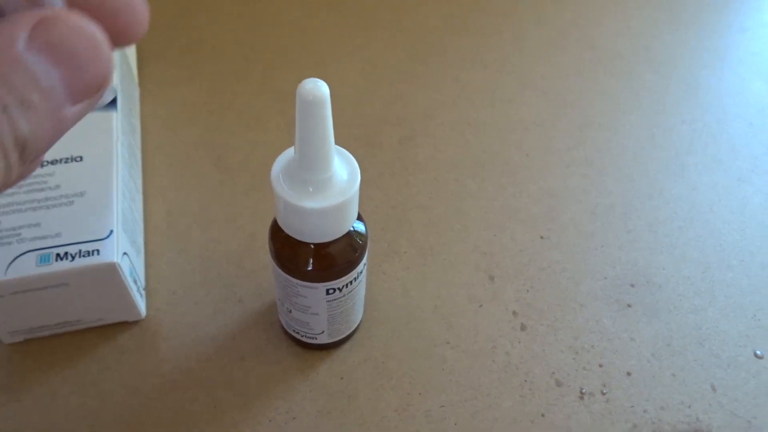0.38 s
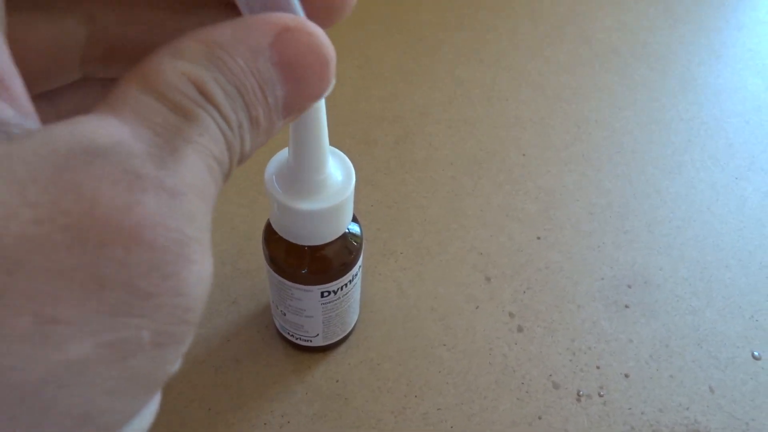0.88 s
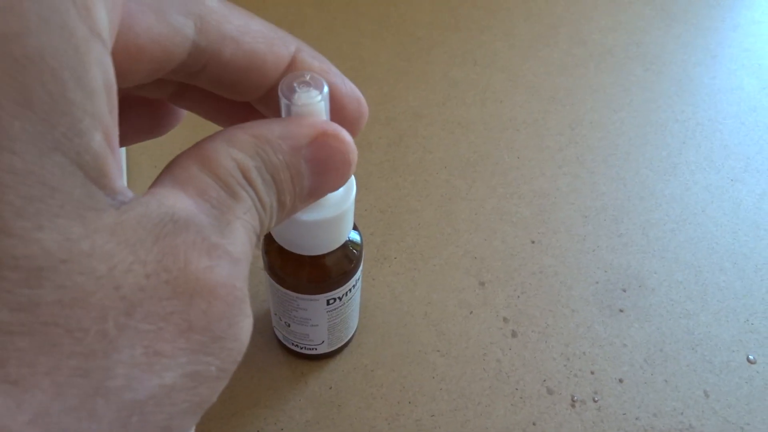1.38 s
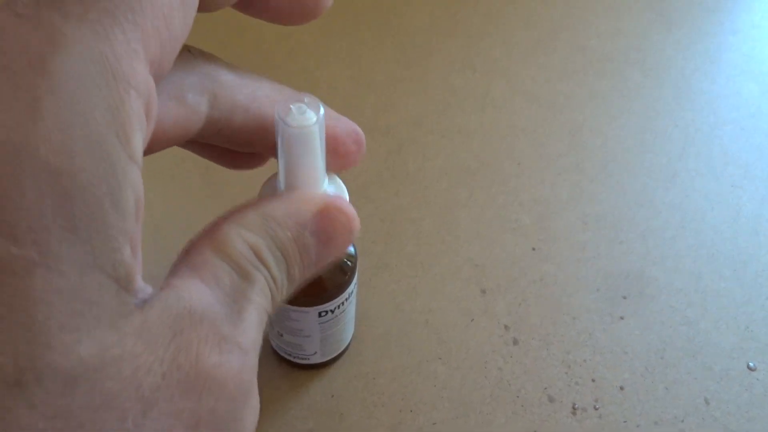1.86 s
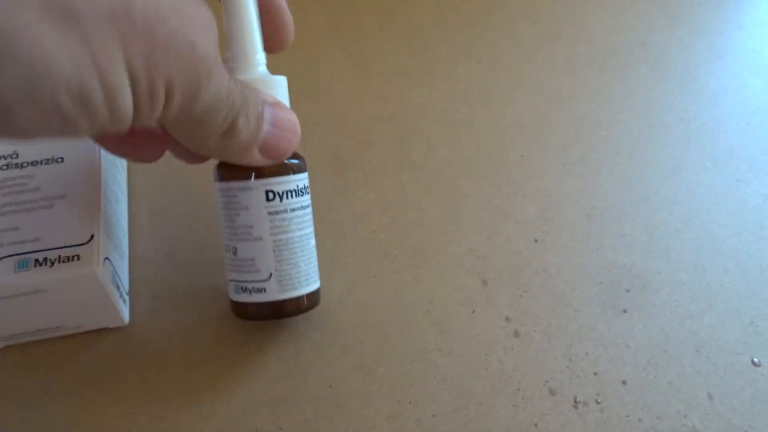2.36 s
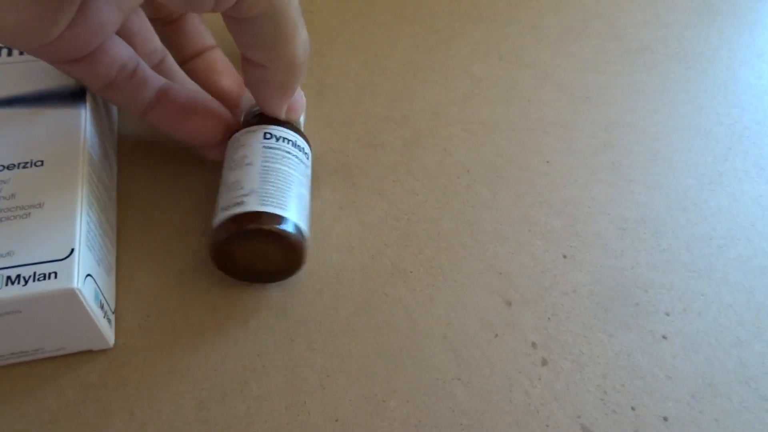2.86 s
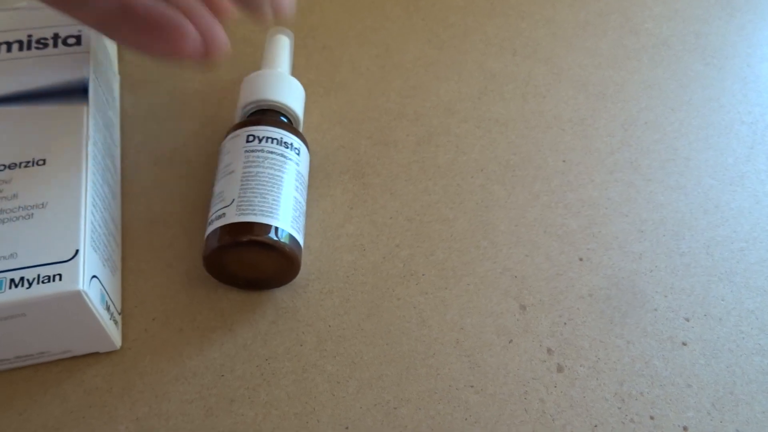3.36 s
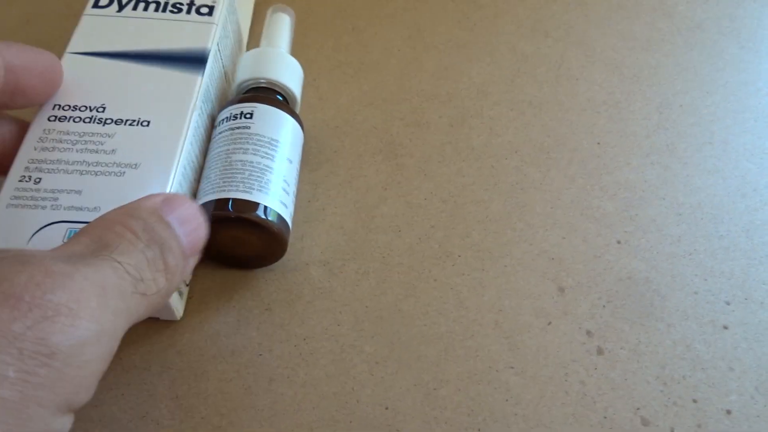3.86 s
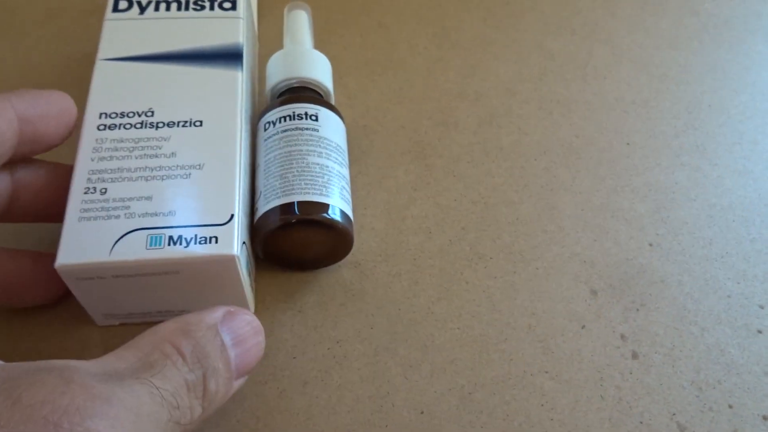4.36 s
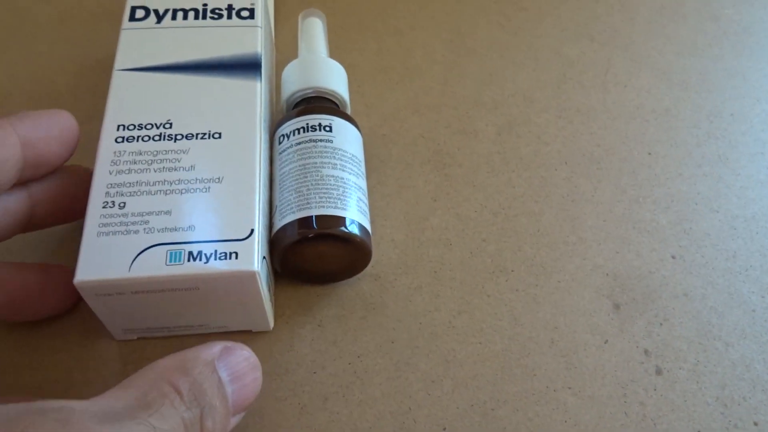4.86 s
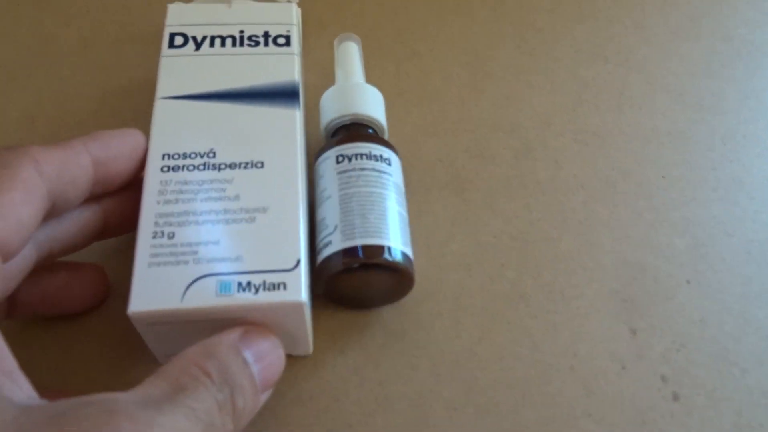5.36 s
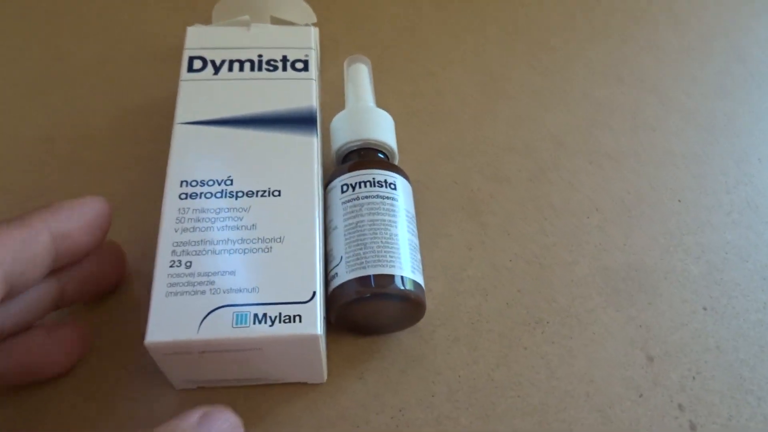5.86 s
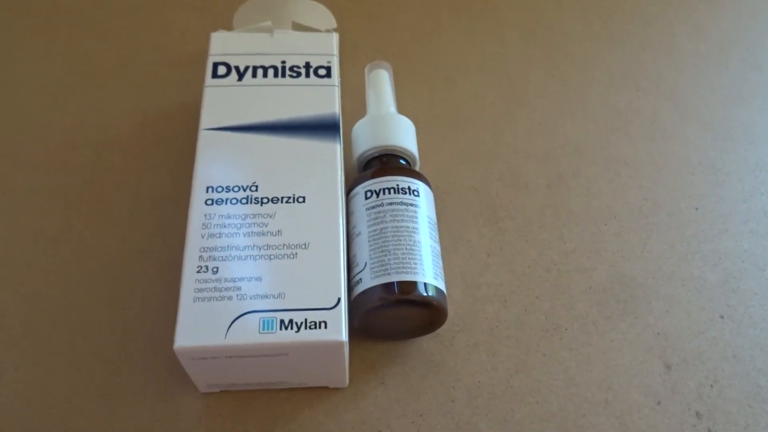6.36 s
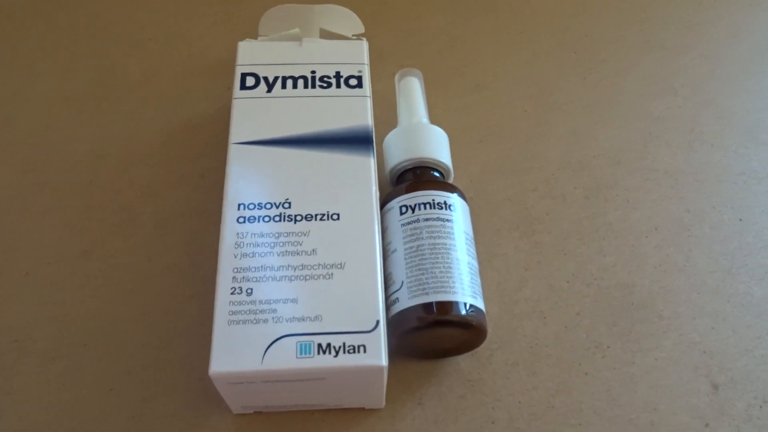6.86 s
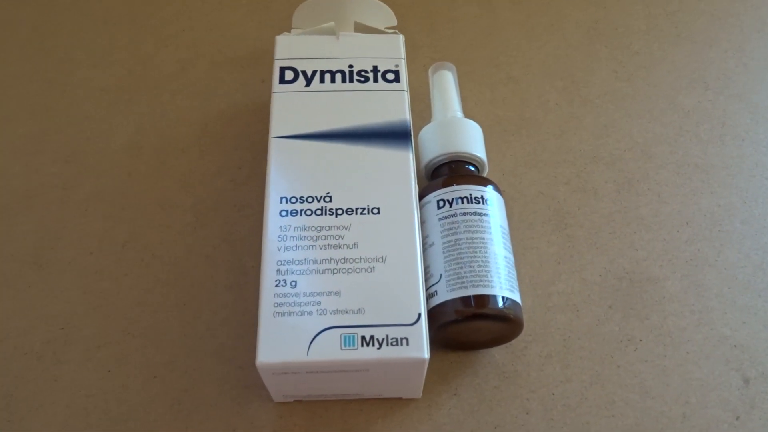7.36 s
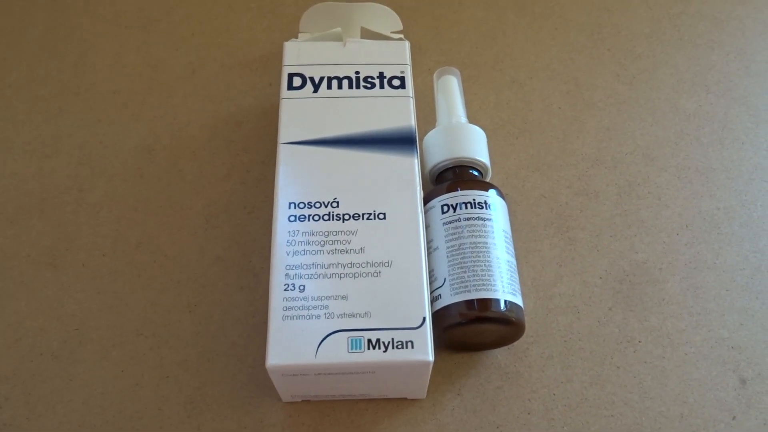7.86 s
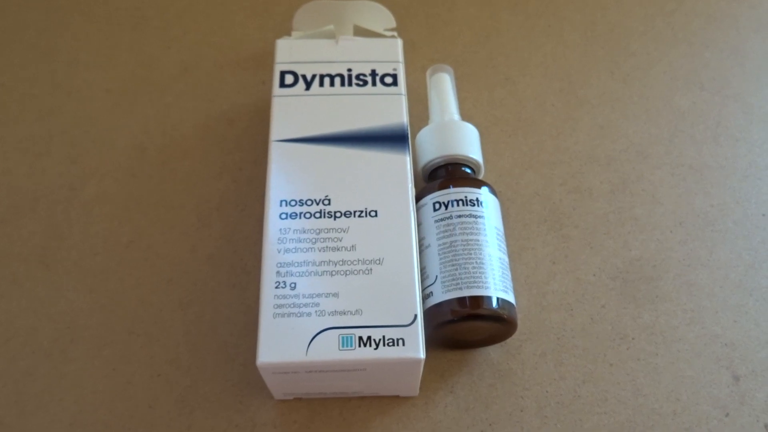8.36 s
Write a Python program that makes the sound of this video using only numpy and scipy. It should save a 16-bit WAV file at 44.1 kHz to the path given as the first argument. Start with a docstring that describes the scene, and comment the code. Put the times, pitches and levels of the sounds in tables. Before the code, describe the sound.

A plastic cap clicks onto a small glass bottle, which knocks on a wooden table; a cardboard box taps beside it while small metal pieces jingle.

```python
"""A wooden table in a quiet room, a phone's microphone close by. A plastic cap is pushed onto a small glass
bottle, the bottle is turned and laid down, and a cardboard box is slid beside it: blows ring the modes of
object and table, drags shake them with stick-slip grains. To the right small metal pieces jingle as decaying,
fluttering notes; cloth and skin rustle as coloured noise. Room hum and microphone hiss lie under it all."""
import sys
import numpy as np
from scipy import signal
from scipy.fft import rfft, irfft, next_fast_len
from scipy.io import wavfile
from scipy.ndimage import uniform_filter1d

SR = 44100
rng = np.random.default_rng(int(sys.argv[2]) if len(sys.argv) > 2 else 0)


def wav_record(signal):
    """Record a signal, one row per channel, as 16-bit PCM in the file named by sys.argv[1]."""
    frames = np.transpose(np.atleast_2d(signal))
    bounded = np.clip(frames, -1, 1)
    # unit amplitude maps onto the largest positive 16-bit level
    quanta = np.round(bounded * 32767).astype(np.int16)
    wavfile.write(sys.argv[1], SR, quanta)


def field_ratio(decibels):
    """Amplitude ratio for a level in dB (20 dB per decade); scalars and array-likes work."""
    return 10 ** (np.asarray(decibels, dtype=float) / 20)


N = 373968


def noise(spectrum):
    """Steady noise of rms 1, its colour drawn through (Hz, dB) points."""
    hz, db = np.transpose(spectrum)
    size = next_fast_len(N)
    f = np.maximum(np.arange(size // 2 + 1) * SR / size, 1)
    gain = field_ratio(np.interp(np.log(f), np.log(hz), db))
    x = irfft(rfft(rng.standard_normal(size)) * gain, size)[:N]
    return x / x.std()


def walk(rate_hz):
    """Random levels drawn at rate_hz and joined by slopes; spread near 1."""
    hold = int(SR / rate_hz)
    levels = np.repeat(rng.standard_normal(N // hold + 1), hold)
    return uniform_filter1d(levels, hold)[:N]


def ring(modes, spread_db=0., detune=0., length_s=.6):
    """Decaying sines of a tapped body, peak 1; each tap may weight and tune its modes differently."""
    hz, db, t60_s = np.transpose(modes)[:, :, None]
    t = np.arange(int(length_s * SR)) / SR
    gain = field_ratio(db + spread_db * rng.standard_normal(hz.shape))
    hz = hz * (1 + detune * rng.standard_normal(hz.shape))
    x = (gain * np.sin(2 * np.pi * hz * t) * field_ratio(-60 * t / t60_s)).sum(axis=0)
    return x / np.abs(x).max()


def add(out, start_s, x):
    """Mix x into out from start_s."""
    i = int(start_s * SR)
    out[i:i + len(x)] += x[:len(out) - i]


def band(x, lo_hz, hi_hz):
    """Band-pass."""
    edges_hz = [lo_hz, min(hi_hz, .45 * SR)]
    return signal.sosfilt(signal.butter(2, edges_hz, "band", fs=SR, output="sos"), x)


def pressure(strokes, peaks_db):
    """Level of a row of strokes: each swells to its peak and dies away, and their powers add."""
    time = np.arange(N) / SR
    power = np.zeros(N)
    for (peak_s, rise_s, fall_s, *_), db in zip(strokes, peaks_db):
        away = np.where(time < peak_s, (peak_s - time) / rise_s, (time - peak_s) / fall_s)
        power += field_ratio(db - 6.74 * np.minimum(away, 4) ** 1.87) ** 2
    return np.sqrt(power)


# colour of the room hum and hiss: pitch_hz, level_db (relative, per Hz)
AIR_COLOUR = [(18, -38), (30, -12), (149, -2.5), (183, -4.5), (716, -11), (1610, -14.5), (4370, -22),
              (10700, -23), (15800, -27)]
# tilt of the stereo side against that colour: pitch_hz, tilt_db
AIR_SIDE_TILT = [(60, -35), (200, -11.5), (700, -5.5), (1300, -6), (4400, -12.5), (15000, -18.5)]


def air():
    """Room hum and microphone hiss as noise: the middle range is wide, bass and treble are centred."""
    hz, db = np.transpose(AIR_COLOUR)
    tilt_hz, tilt_db = np.transpose(AIR_SIDE_TILT)
    side_colour = np.transpose([hz, db + np.interp(np.log(hz), np.log(tilt_hz), tilt_db)])
    side = field_ratio(-7.5) * noise(side_colour) * np.array([[1], [-1]])
    swell = field_ratio(-60.5 + .6 * walk(1.5))
    return swell * (noise(AIR_COLOUR) + side)


# notes of the metal pieces, one list each for the high, low and middle notes: pitch_hz; close pairs beat
METAL_HZ = [
    [10905, 10980, 11055, 8530, 11872, 11895, 14440],
    [5158, 6006, 5590, 1410],
    [10400, 10420],
]
# the same lists: level_db (relative)
METAL_DB = [
    [-2, 1, -13, -13, -8, -13, -9],
    [6, -8, -15, -22],
    [0, -9],
]
# high, low, middle: t60_s before the damping
METAL_T60_S = [0.44, 0.86, 0.23]
# high, low, middle: swell_s of the chatter
CHATTER_S = [0.011, 0.03, 0.011]
# high, low, middle: damping_s
METAL_DAMP_S = [.15, .165, .14]
# high, low, middle: jump_db, spread of the level jumps before they are slewed
FLUTTER_DB = [4.5, 2.2, 4]
# high, low, middle: rebound_db, level against the first touch
REBOUND_DB = [-11, -3, -2]
# touches: start_s, strength_db, rebound_after_s, low_db (low notes against the high ones)
JINGLES = [(0.001, -27, .04, -12), (0.251, -29, .04, -12), (2.611, -38, .028, -10),
           (2.827, -32.5, 0.09, -11.5), (3.2191, -52, .03, -14), (4.205, -65, .03, -3),
           (4.85, -58, .03, -13), (5.7846, -56.5, .03, -11), (6.088, -33.5, 0.069, -13),
           (6.232, -28, .027, -13), (6.334, -27, .042, -6), (6.4388, -25, .059, -13),
           (6.915, -34, .042, -11.5), (7.042, -31.5, .03, -12), (7.6054, -38, .028, -10.5),
           (8.253, -28, .025, -20)]


def brushed(modes, jump_db):
    """Notes of pieces that keep brushing each other: each jumps in level at uneven moments."""
    x = 0
    for mode in modes:
        note = field_ratio(mode[1] + 2 * rng.standard_normal()) * ring([mode], detune=0.00052)
        edges = np.cumsum(rng.exponential(.022 * SR, size=40))  # mean time between jumps .022 s
        levels = rng.standard_normal(41)
        steps = levels[np.searchsorted(edges, np.arange(len(note)))]
        x = x + note * field_ratio(jump_db * uniform_filter1d(steps, size=40))
    return x / np.sum(field_ratio(np.array(modes)[:, 1]))


def metal_jingle():
    """Metal pieces swing together and rebound; chatter swells the notes, mutual contact cuts them short."""
    out = np.zeros(N)
    t = np.arange(int(.6 * SR)) / SR
    groups = [[(f, g, t60_s) for f, g in zip(hz, db)]
              for hz, db, t60_s in zip(METAL_HZ, METAL_DB, METAL_T60_S)]
    swell = 1 - np.exp(-t / np.array(CHATTER_S)[:, None])
    damping = np.exp(-(t / np.array(METAL_DAMP_S)[:, None]) ** 3)
    shapes = swell * damping
    for start_s, strength_db, gap_s, low_db in JINGLES:
        first = strength_db + np.array([0, low_db, -6])
        for touch_s, levels in ((start_s, first), (start_s + gap_s, first + REBOUND_DB)):
            for level_db, modes, jump_db, shape in zip(levels, groups, FLUTTER_DB, shapes):
                add(out, touch_s, field_ratio(level_db) * brushed(modes, jump_db) * shape)
    return out


# cloth rubs: peak_s, rise_s, fall_s, level_db (before the flicker)
RUSTLES = [(0.2, 0.3, 0.25, -59), (5.28, 0.056, 0.074, -54.5), (6.42, 0.15, 0.36, -55)]
# colour of cloth and scrape hiss: pitch_hz, level_db (relative, per Hz)
CLOTH_COLOUR = [(2500, -1), (4000, -8.5), (8000, -10), (11500, -6), (13500, -10), (15800, -34)]


def cloth_rub(flicker):
    """Bright friction noise of rubbing cloth, and the hiss that goes with each drag over the table."""
    hiss = pressure(STROKES, np.array(STROKES)[:, 3] - 8)  # 8 dB under the scrape setting
    rub = pressure(RUSTLES, np.array(RUSTLES)[:, 3])
    return noise(CLOTH_COLOUR) * np.hypot(hiss, rub) * flicker


# dry ticks, and the hard cracks of the knocks at 3.735 and 3.874 s:
# start_s, peak_db (before panning), pitch_hz
TICKS = [(0.589, -33.5, 11600), (0.677, -44, 10800), (2.4936, -34, 12300), (2.5264, -36, 12200),
         (2.7464, -28, 10200), (2.838, -41, 8200), (3.028, -42, 9000), (3.7351, -21, 3000),
         (3.8735, -14, 2700), (4.806, -43.5, 10900), (8.1056, -40, 10800)]


def dry_ticks():
    """Dry ticks and the hard cracks of two knocks, each two neighbouring sines gone within milliseconds."""
    out = np.zeros(N)
    for start_s, peak_db, hz in TICKS:
        crack = ring([(hz, 0, .003), (1.03 * hz, -4, .003)], length_s=.01)
        add(out, start_s, field_ratio(peak_db) * crack)
    return out


# modes of the table top: pitch_hz, level_db (relative), t60_s
TABLE = [(79.2, -16.5, 0.4), (113, -18, 0.24), (152, 0.5, 0.13), (195.5, 1, 0.11), (262, -2.5, 0.059),
         (403, 0, 0.023)]


def blows(events, body, contact_ms, crack_db, snap_db, shudder_s, shudder_db):
    """Each blow pushes object and table, cracks, snaps, and leaves the object shuddering in its seat."""
    out = np.zeros(N)
    t = np.arange(int(.3 * SR)) / SR
    for start_s, body_db, table_db, *tune in events:
        # a blow weaker than -17.5 dB is softer: longer contact, less snap, sooner settled
        soft_db = 0.4 * (-17.5 - body_db)
        softness = field_ratio(soft_db)
        push = np.hanning(int(np.clip(contact_ms * softness, .05, 5) * SR / 1000) + 3)
        tuned = np.multiply(body, [np.prod(tune), 1, 1])
        own = field_ratio(body_db) * ring(tuned, spread_db=1.0, detune=0.03)
        thump = field_ratio(table_db) * ring(TABLE, spread_db=7.0)
        add(out, start_s, -np.convolve(own + thump, push / push.sum()))
        shaking, cracking, snapping = rng.standard_normal((3, len(t)))
        shudder = signal.fftconvolve(own, shaking * np.exp(-t * softness / shudder_s))
        add(out, start_s, field_ratio(shudder_db) * shudder)
        crack = band(cracking * np.exp(-t / 0.0027), 270, 3280 / field_ratio(soft_db / 2))
        add(out, start_s, field_ratio(body_db + crack_db) * band(crack, 250, 4040))
        snap = band(snapping * np.exp(-t / 0.0019), 950, 9000)
        add(out, start_s, field_ratio(body_db + snap_db - soft_db) * snap)
    return out


# start_s, ring_db of the cap, thump_db of the table, pitch_hz: it falls as the cap seats
# and differs when fingers knock it later
CAP_BLOWS = [(0.9683, -32, -52, 2245), (1.05, -42, -46, 2250), (1.2448, -33, -33, 1910),
             (1.6302, -18, -9.5, 1470), (2.728, -44, -50, 1590)]
# modes of the cap: multiple of its pitch, level_db (relative), t60_s
CAP = [(.9, 5.9, 0.042), (1.06, 29, 0.023), (1.2, 20, 0.032), (1.9, 6.9, 0.0046)]


def cap_blows():
    """The cap is pressed down, so the table first moves the other way than under a rebounding bottle."""
    return -blows(CAP_BLOWS, CAP, contact_ms=0.041, crack_db=-1, snap_db=-3.5,
                  shudder_s=0.073, shudder_db=-41.0)


# start_s, ring_db of the bottle, thump_db of the table
BOTTLE_BLOWS = [(1.029, -33, -37), (1.542, -65, -28.5), (1.708, -53, -19), (1.842, -31.5, -46),
                (1.871, -44, -27.5), (2.168, -14, -22.5), (2.288, -34, -54), (2.596, -39.5, -35.5),
                (2.87, -34, -18.5), (2.874, -9.5, -16), (3.185, -17.5, -16.5)]
# modes of the bottle: pitch_hz, level_db (relative), t60_s
BOTTLE = [(413, 4.2, 0.012), (597, 2.3, 0.013), (650, 1.6, 0.0095), (1040, 7.7, 0.0036),
          (1674, 3.1, 0.0071), (2200, 1.3, 0.0088)]


def bottle_blows():
    """The bottle knocks with a longer contact than the cap, and with less snap."""
    return blows(BOTTLE_BLOWS, BOTTLE, contact_ms=0.34, crack_db=-10, snap_db=-22.5,
                 shudder_s=0.0065, shudder_db=-24.0)


# things dragged over the table: peak_s, rise_s, fall_s, scrape_db,
# weight_db (rumble of the table over the scrape)
STROKES = [(1.05, 0.059, 0.19, -63.5, 3.5), (1.298, 0.15, 0.063, -73.5, 17), (1.66, 0.029, 0.053, -55, 3),
           (1.9, 0.087, 0.066, -57, -1), (2.2, 0.055, 0.058, -57, 7.5), (2.295, 0.017, 0.021, -43, -9),
           (2.385, 0.023, 0.03, -48, -4), (2.459, 0.04, 0.052, -45, -8), (2.62, 0.03, 0.05, -62, 15),
           (2.74, 0.078, 0.1, -62.5, 9), (2.897, 0.017, 0.065, -38, 6), (3.051, 0.13, 0.11, -52, -3),
           (3.703, 0.0038, 0.081, -38, -12), (3.915, 0.029, 0.04, -52, -12), (4.3, 0.78, 0.11, -66, -1),
           (5.28, 0.022, 0.2, -76, 18.5), (6.42, 0.039, 0.14, -62, 10), (8.38, 0.081, 0.19, -57.5, -8)]


def table_drag():
    """Uneven stick-slip grains shake the table's modes and the object that slides."""
    grains = rng.standard_normal(N) * field_ratio(3.15 * walk(80))
    low = signal.fftconvolve(grains, ring(TABLE, length_s=0.03))[:N]
    start, end = CAP_BLOWS[0], CAP_BLOWS[2]
    loose_cap, seated_cap = (np.multiply(CAP, [blow[-1], 1, 1]) for blow in (start, end))
    bodies = [loose_cap, seated_cap, TABLE[5:] + BOTTLE[:3], BOX]
    loose, deep, bottle, box = (signal.fftconvolve(grains, ring(m, length_s=.005))[:N] for m in bodies)
    # the cap catches and slips on its way down, and its pitch falls
    down = np.clip((np.arange(N) / SR - start[0]) / (end[0] - start[0]), 0, 1)
    cap = (np.sqrt(1 - down) * loose + np.sqrt(down) * deep) * field_ratio(4.5 * walk(30))
    skin = band(grains, 400, 4300)
    cloth = band(band(grains, 1800, 3940), 1800, 3940)
    # a bare hand, the cap on the neck, the rocking bottle, the box, the bare hand again, a fold of cloth
    which = np.searchsorted([.9, 1.5, 3.5, 4.8, 8], np.arange(N) / SR)
    sliding = np.choose(which, [b / b.std() for b in (skin, cap, bottle, box, skin, cloth)])
    high = sliding + 0.25 * skin / skin.std()
    scrape_db, weight_db = np.array(STROKES)[:, 3:].T
    rumble = pressure(STROKES, scrape_db + weight_db) * low / low.std()
    return rumble + pressure(STROKES, scrape_db) * high


# fingertip slides: peak_s, rise_s, fall_s, level_db (before the flicker)
SLIDES = [(1.2, 0.087, 0.059, -68), (1.9, 0.062, 0.044, -60), (2.2, 0.11, 0.15, -58),
          (2.65, 0.19, 0.51, -61), (3.45, 0.26, 0.12, -65.5), (4.3, 0.055, 0.063, -58.5)]
# colour of the fingertips: pitch_hz, level_db (relative, per Hz)
FINGER_COLOUR = [(3000, -10), (8800, -17), (10100, -3.5), (11500, -5), (13000, -29), (15800, -24)]


def finger_slide(flicker):
    """Fingertips slide on smooth glass and card: a thin high whisper of noise."""
    return noise(FINGER_COLOUR) * pressure(SLIDES, np.array(SLIDES)[:, 3]) * flicker


# box taps, and at 6.39 s a dull bump of the table: start_s, ring_db, thump_db of the table;
# a knock of box against bottle sounds lower; its last number scales the pitch
BOX_BLOWS = [(3.701, -29.5, -31), (3.734, -22.5, -38), (3.873, -16, -62, .78), (3.915, -38, -41),
             (4.098, -43, -68), (4.108, -36, -71), (4.181, -41, -55), (4.252, -40, -54), (4.312, -29, -74),
             (4.326, -40, -66), (4.533, -34.5, -57), (5.677, -29, -55), (5.695, -31.5, -66),
             (6.39, -31.5, -36.5)]
# modes of the box: pitch_hz, level_db (relative), t60_s
BOX = [(588, -13, 0.05), (814, 1, 0.03), (1118, 15, 0.014), (1980, -8.5, 0.02), (2400, 5, 0.009),
       (3250, 3, 0.007)]


def box_taps_and_bump():
    """Taps of the cardboard box, and one dull bump of the table, crack strongly and ring briefly."""
    return blows(BOX_BLOWS, BOX, contact_ms=0.24, crack_db=3.5, snap_db=-15,
                 shudder_s=0.017, shudder_db=-30)


# sleeve sweeps: peak_s, rise_s, fall_s, level_db (before the flicker)
SWISH = [(6.3, 0.27, 0.06, -45.5)]
# colour of the sleeve: pitch_hz, level_db (relative, per Hz)
SLEEVE_COLOUR = [(2000, -8.5), (7000, -5.5), (11500, 2.5), (15800, -3.5)]


def sleeve_swish():
    """A sleeve sweeps past and stops short: bright noise that swells slowly and falls fast."""
    return noise(SLEEVE_COLOUR) * pressure(SWISH, np.array(SWISH)[:, 3]) * field_ratio(0.76 * walk(25))


def room(x):
    """Diffuse tail, different at each microphone port, duller than the direct sound."""
    t60_s, level_db, dull_hz = 0.45, -15, 3900
    t = np.arange(int(.6 * SR)) / SR
    tail = rng.standard_normal((3, len(t))) * field_ratio(-60 * t / t60_s) * (1 - np.exp(-t / 0.00073))
    ports = tail[0] + 0.29 * tail[1:]  # a shared part and a part of its own
    ports = signal.lfilter([1], [1, -np.exp(-2 * np.pi * dull_hz / SR)], ports)
    ports /= np.sqrt(np.sum(ports ** 2, axis=1, keepdims=True))
    return field_ratio(level_db) * signal.fftconvolve(x[None], ports, axes=1)[:, :N]


def pan(x, left_db):
    """Place a sound by its left minus right level."""
    return x * field_ratio(np.array([[left_db], [-left_db]]) / 2)


def scene():
    """Handling in the middle, metal and cloth to the right, the room around them."""
    hands = cap_blows() + bottle_blows() + table_drag() + box_taps_and_bump()
    # a table top carries no deep bass
    hands = signal.sosfilt(signal.butter(4, 70, "high", fs=SR, output="sos"), hands)
    metal = metal_jingle()
    flicker = field_ratio(2.7 * walk(40))  # cloth and fingertips flicker together
    rustle = cloth_rub(flicker) + finger_slide(flicker) + sleeve_swish()
    # the thump comes through the table, so only the airborne part fills the room; the metal is further off
    tail = room(band(hands + 2.4 * metal, 236, 13400))
    direct = pan(hands, -0.2) + pan(dry_ticks(), -1.7) + pan(metal, -3.5) + pan(rustle, -2.6)
    return direct + tail + air()


def low_pass(x):
    """Removes everything above the highest recorded frequency."""
    return signal.sosfilt(signal.butter(12, 16760, fs=SR, output="sos"), x)


def record(dry):
    """The phone cuts the top above 15.9 kHz with a steep low-pass."""
    top_cut = signal.ellip(8, .2, 60, 15900, fs=SR, output="sos")
    mix = signal.sosfilt(top_cut, dry)
    return low_pass(mix)


dry = scene()
out = record(dry)
wav_record(out)
```